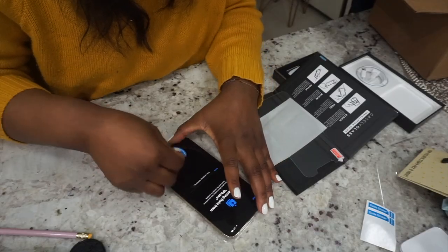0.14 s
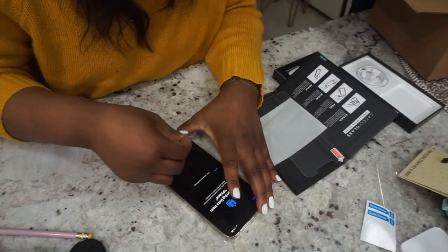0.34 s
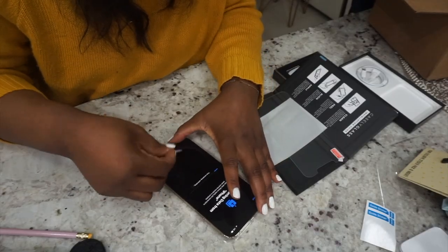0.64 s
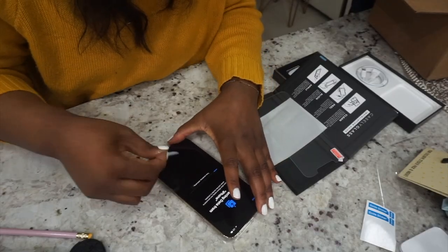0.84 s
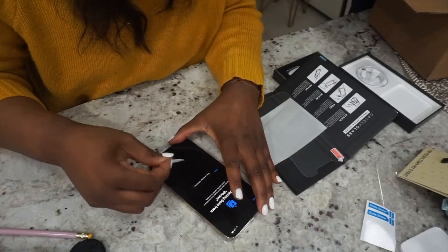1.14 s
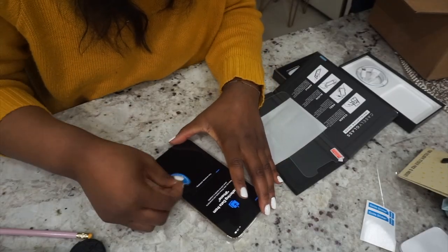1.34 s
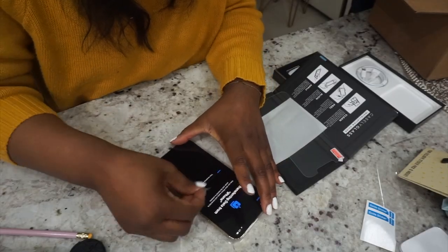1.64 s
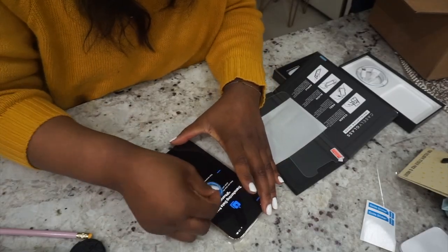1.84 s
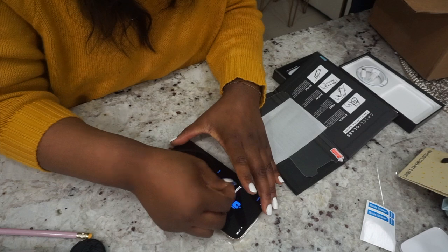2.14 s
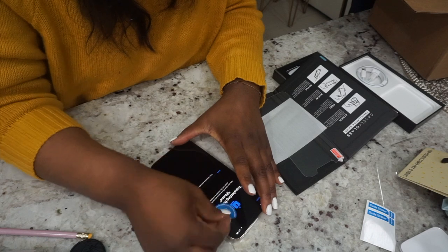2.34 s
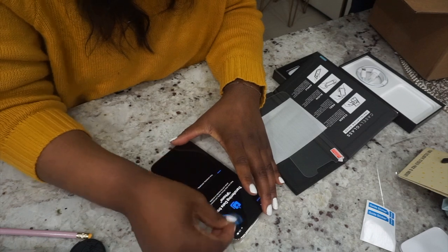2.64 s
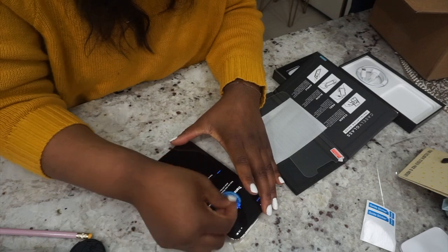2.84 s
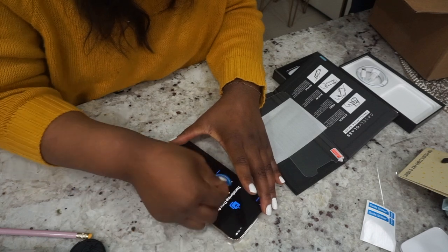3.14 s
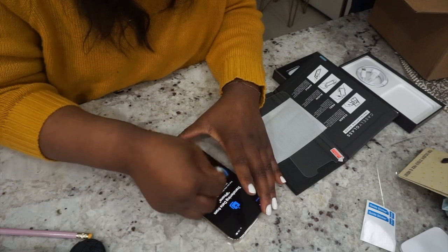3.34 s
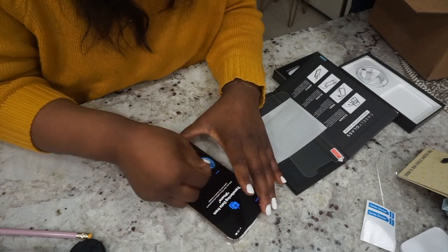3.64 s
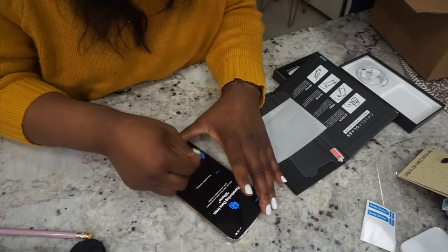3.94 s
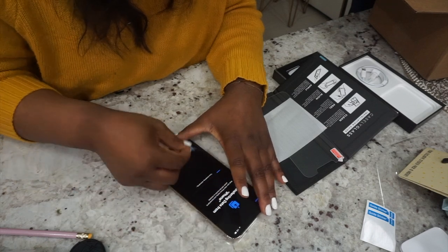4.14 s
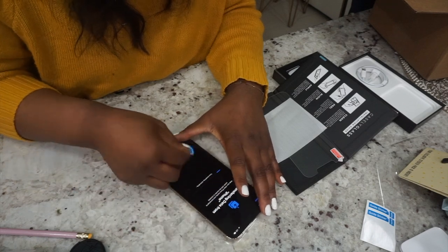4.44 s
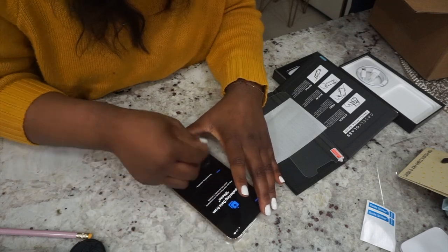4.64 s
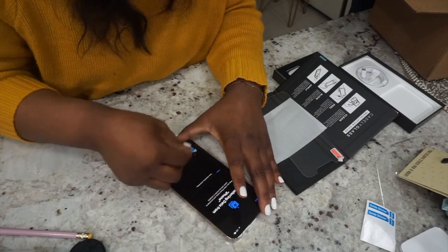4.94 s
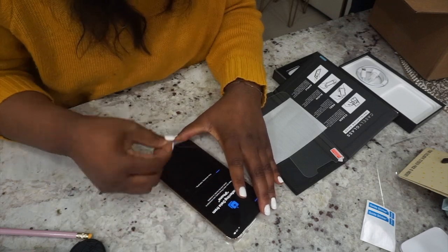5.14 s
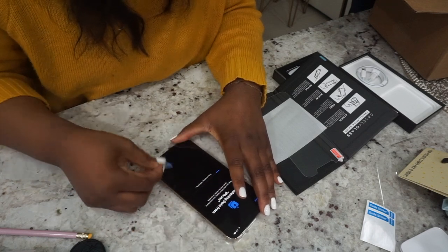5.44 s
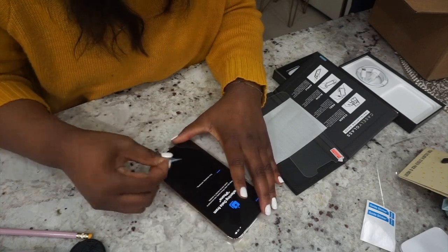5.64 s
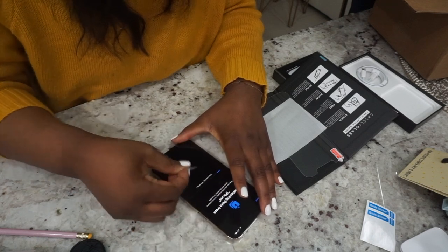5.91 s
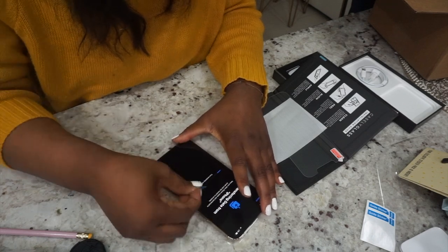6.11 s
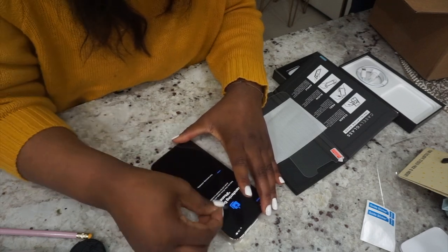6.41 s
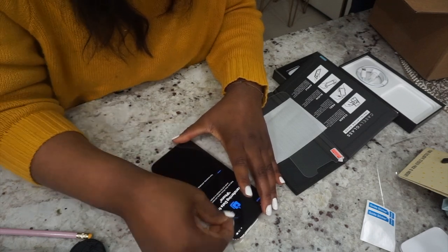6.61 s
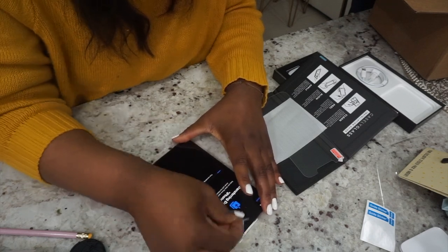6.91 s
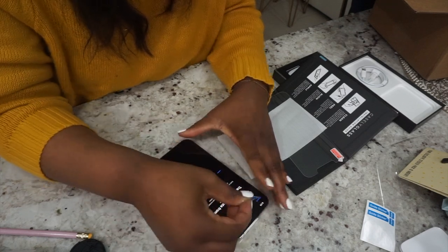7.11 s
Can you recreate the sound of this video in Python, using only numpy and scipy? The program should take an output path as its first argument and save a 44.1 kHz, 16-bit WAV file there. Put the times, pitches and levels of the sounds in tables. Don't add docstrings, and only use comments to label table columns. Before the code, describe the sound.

Long fingernails peck and chatter irregularly on a phone's glass lying on stone, crisp ticks with scratchy skids and small knocks, in a quiet, lively room.

```python
import sys
import numpy as np
from scipy import signal
from scipy.fft import rfft, irfft, next_fast_len
from scipy.io import wavfile
from scipy.ndimage import uniform_filter1d

SR = 44100
rng = np.random.default_rng(int(sys.argv[2]) if len(sys.argv) > 2 else 0)


def gain_from_db(level_db):
    decades = np.asarray(level_db, float) / 20
    return 10 ** decades


def to_wav(s):
    ch = np.atleast_2d(s).T
    pcm = np.round(np.clip(ch, -1, 1) * 32767)
    wavfile.write(sys.argv[1], SR, pcm.astype(np.int16))


N = 320607


def at_hz(points, hz):
    point_hz, value = np.array(points).T
    return np.interp(np.log(hz + 1), np.log(point_hz), value)


def shaped(x, response):
    size = next_fast_len(x.shape[-1] + SR // 20, True)
    hz = np.arange(size // 2 + 1) * SR / size
    return irfft(rfft(x, size) * response(hz), size)[..., :x.shape[-1]]


def filtered(x, order, hz, kind):
    return signal.sosfilt(signal.butter(order, hz, kind, fs=SR, output="sos"), x + 1e-18)


def contact(t, rise_s):
    return np.sin(np.pi / 2 * np.clip(t / rise_s, 0, 1)) ** 2


def place(grains, contacts, lead_s=0.0):
    out = np.zeros(N + SR)
    for s, grain in zip(np.array(contacts)[:, 0], grains):
        start = int((s - lead_s) * SR)
        out[start:start + len(grain)] += grain
    return out[:N]


def struck(modes, count, size, spread_db, rise_s, detune, near_hz=None, db_per_octave=0.0, damping=0.69):
    t = np.arange(size) / SR
    draws = rng.standard_normal((count, len(modes), 3))
    out = 0
    for k, (hz, level_db, t60) in enumerate(modes):
        far = 0 if near_hz is None else np.abs(np.log2(hz / near_hz))
        gain = gain_from_db(level_db + spread_db * draws[:, k, :1] - db_per_octave * far)
        pitch = hz * (1 + detune * draws[:, k, 1:2])
        decay = gain_from_db(-60 * (damping * t / t60) ** damping)
        out = out + gain * np.sin(2 * np.pi * pitch * t + 3 * draws[:, k, 2:]) * decay
    out = out * contact(t, rise_s)
    return out / np.abs(out).max(axis=1, keepdims=True)


# frequency in Hz, level in dB per Hz.
HISS_SPECTRUM = [(18, -34), (30, -8), (151, -5), (296, -6), (353, -3), (9900, -15.5), (11500, -23),
                 (15000, -60), (22000, -120)]
# frequency in Hz, likeness from 0 to 1.
HISS_LIKENESS = [(60, 1), (300, 0), (1500, 0), (6000, 0)]


def room_tone(level_db=-63):
    def alike(hz):
        return np.clip(at_hz(HISS_LIKENESS, hz), 0, 1)
    mid, side = rng.standard_normal((2, N))
    mid = shaped(mid, lambda hz: gain_from_db(at_hz(HISS_SPECTRUM, hz)) * np.sqrt(1 + alike(hz)))
    side = shaped(side, lambda hz: gain_from_db(at_hz(HISS_SPECTRUM, hz)) * np.sqrt(1 - alike(hz)))
    return gain_from_db(level_db) * np.array([mid + side, mid - side]) / mid.std()


# frequency in Hz, t60 in seconds.
WALL_DECAY = [(100, 0.88), (500, 0.7), (2500, 0.53), (9700, 0.54)]
# frequency in Hz, level in dB.
WALL_COLOUR = [(100, -1), (300, -2), (750, -0.5), (1500, -2), (3000, -2.5), (5500, -4), (8000, 0.5),
               (11000, -8)]


def walls(x, level_db=-34.5, near_db=22.0, near_t60=0.019, alike_hz=1470.0):
    t = np.arange(SR * 3 // 4) / SR
    white = rng.standard_normal((2, 2, len(t)))
    edges_hz = 70 * 2 ** np.arange(0, 8, .5)
    tail = 0
    for k, (low, high) in enumerate(zip(edges_hz, edges_hz[1:])):
        mid, side = filtered(white[k % 2], 2, [low, high], "band")
        hz = np.sqrt(low * high)
        alike = 1 / (1 + (hz / alike_hz) ** 2)
        fade = gain_from_db(-60 * t / at_hz(WALL_DECAY, hz)) + gain_from_db(near_db - 60 * t / near_t60)
        pair = np.sqrt(1 + alike) * mid + np.sqrt(1 - alike) * side * [[1], [-1]]
        tail = tail + gain_from_db(at_hz(WALL_COLOUR, hz)) * fade * pair
    tail = tail * gain_from_db(level_db) * contact(t, .011)
    return signal.fftconvolve(x[None], tail, axes=1)[:, :N]


# delay in ms, level in dB.
FIRST_ECHO = (9.1, -15.5)
# direct path in ms, counter bounce in ms after it.
PORT_DELAYS = [(.0, .113), (.027, .082)]
# direct level in dB, counter bounce level in dB.
PORT_LEVELS = [(-1.8, -9), (0.5, -10)]
# frequency in Hz, difference in dB.
PORT_TILT = [(200, 2), (1000, 0.5), (4000, -1), (9000, -3), (11000, 4), (12500, 9)]


def ports(x):
    def path(hz, ms, level_db):
        return gain_from_db(level_db) * np.exp(-2j * np.pi * hz * ms / 1000)

    echo_ms, echo_db = FIRST_ECHO
    x = shaped(x, lambda hz: 1 + path(hz, echo_ms, echo_db))
    heard = []
    for (ms, late_ms), (db, late_db), half in zip(PORT_DELAYS, PORT_LEVELS, (.5, -.5)):
        def response(hz):
            bounced = 1 + path(hz, late_ms, late_db)
            return path(hz, ms, db) * bounced * gain_from_db(half * at_hz(PORT_TILT, hz))
        heard.append(shaped(x, response))
    return np.array(heard)


def shadows(x, level_db=-9.0, from_hz=3300.0):
    flicker = uniform_filter1d(rng.standard_normal(N), size=90)
    bright = filtered(x, 2, from_hz, "high")
    return gain_from_db(level_db) * bright * flicker / flicker.std() * [[1], [-1]]




def shared_out(contacts, tick_db, knock_db, scratch_db):
    return [(s, db + tick_db, hz, db + knock_db, db + scratch_db) for s, db, hz in contacts]


# start in seconds, strength in dB.
PRESSES = [(.0574, -46), (.463, -45), (0.4738, -47.5), (0.7227, -45), (.727, -43), (1.0268, -53),
           (1.0646, -42), (1.2909, -43), (1.781, -36.5), (2.8277, -37.5), (3.0763, -47.5), (3.319, -43),
           (4.2025, -46), (4.405, -51), (4.5033, -36.5), (4.6545, -40.5), (4.927, -42), (5.0169, -27.5),
           (5.217, -47), (5.2735, -41), (5.4493, -42), (5.4801, -48), (5.523, -38), (5.9587, -44),
           (6.0233, -44), (6.0299, -29), (6.2064, -41), (6.8683, -35), (7.2344, -39)]


def presses():
    return shared_out([(s, db, 2100) for s, db in PRESSES], -7, 0.09, -11.5)


def brush(start_s=.478, end_s=0.56, press_db=-60, swell_db_per_s=298):
    times = np.linspace(end_s, start_s, num=14) + rng.uniform(-.002, .002, size=14)
    return [(s, -54, 3500, press_db + swell_db_per_s * (s - start_s), -54) for s in times]


# start in seconds, strength in dB.
SKIDS = [(0.4893, -47), (1.0434, -37), (1.5595, -36), (2.1023, -29.5), (2.1107, -47), (2.297, -23.5),
         (2.343, -37), (2.906, -39), (2.9178, -31), (3.8953, -34.5), (3.901, -27), (3.971, -27.5),
         (4.6817, -24.5), (4.73, -33), (5.017, -25), (5.0465, -34), (5.2738, -27.5), (5.52, -26.5),
         (5.529, -27), (5.9856, -46), (6.023, -33), (6.298, -30), (6.5648, -35.5), (6.8298, -41)]


def skids():
    return shared_out([(s, db, 2900) for s, db in SKIDS], -10, -19, 0.092)


def wobble(start_s=7.0874, swing_s=.0558, shrink=.853, other_edge_share=.335):
    swings_s = swing_s * shrink ** np.arange(5)
    near, other = [], []
    for k, swing in enumerate(swings_s):
        s = start_s + swings_s[:k].sum()
        db = -23.5 - 0.86 * k * k
        near.append((s, db, 2500))
        other.append((s + other_edge_share * swing, db - 0.5, 2500))
    return shared_out(near, -2.5, 0.1, -20.5) + shared_out(other, -5, 0.1, -27)


# start in seconds, strength in dB, glass pitch in Hz.
TIPS = [(1.0078, -36, 2200), (1.0106, -38.5, 2930), (1.0942, -24, 1730), (1.1036, -25.5, 2650),
        (1.2814, -35.5, 2560), (1.305, -22, 2600), (1.3538, -30, 1520), (1.37, -23.5, 1710),
        (1.3772, -25.5, 2680), (1.5545, -27, 2520), (1.573, -23, 2640), (2.2887, -35.5, 2260),
        (2.5476, -40, 2300), (2.8606, -29, 1470), (2.8694, -25.5, 2650), (3.5944, -43, 2080),
        (3.6753, -53, 1360), (3.8756, -43.5, 2830), (4.1396, -44, 2850), (5.0351, -48, 1480),
        (5.4886, -17.5, 1590), (5.5069, -19, 2680), (5.7757, -36.5, 2860), (5.9944, -19, 1150),
        (6.0144, -20.5, 2580), (6.2681, -22.5, 2520), (6.2763, -22.5, 2840), (6.4767, -40, 2460),
        (6.7466, -41, 2470)]


def tips():
    return shared_out(TIPS, -2, 0.091, -19)


# start in seconds, strength in dB, glass pitch in Hz, body knock in dB.
CENTRED_HITS = [
    (4.1206, -36.5, 2400, -48),
    (4.4779, -16, 3000, -57),
    (5.0141, -20, 4340, -62),
    (5.5374, -17, 3030, -31),
    (5.5450, -21, 2270, -33),
    (6.8616, -24.5, 1520, -52),
]
# start in seconds, strength in dB, glass pitch in Hz, body knock in dB.
SQUARE_HITS = [(.7711, -62, 2350, -60), (4.215, -43, 4270, -53), (0.4004, -44.5, 3130, -62),
               (.971, -47, 3070, -54), (1.0559, -17, 3280, -48), (1.071, -47, 3170, -55),
               (1.3477, -24, 2130, -48), (1.6171, -25, 1780, -32), (2.1387, -22, 2940, -29.5),
               (2.3568, -28.5, 2450, -61), (2.3815, -31, 1310, -49), (2.6456, -17, 2390, -35.5),
               (3.1646, -32, 2650, -32), (3.419, -22, 4380, -36), (3.4196, -21.5, 1430, -35),
               (1.252, -48, 3500, -60), (4.4159, -42.5, 2960, -57), (4.4572, -19, 4200, -57),
               (4.7239, -28, 5250, -59), (4.7441, -26, 3020, -42), (4.7616, -29, 2120, -32),
               (4.7712, -31.5, 3400, -50), (5.2642, -24.5, 2900, -43), (5.2672, -19.5, 3500, -32),
               (5.2846, -35, 2040, -51), (5.564, -30, 2200, -43), (6.5954, -23, 2500, -37),
               (7.0658, -31, 2700, -42)]


def square_hits():
    centred = [(s, db, hz, knock_db, db - 19) for s, db, hz, knock_db in CENTRED_HITS]
    return centred + [(s, db, hz, knock_db, db - 12.5) for s, db, hz, knock_db in SQUARE_HITS]


# start in seconds, strength in dB, glass pitch in Hz, slide in dB.
SLAPS = [(1.6072, -31, 2000, 7.5), (1.6272, -21, 2100, 4), (1.8984, -25, 1570, 7.5), (1.9068, -34, 1420, 3),
         (2.1208, -23.5, 1370, 4), (2.1281, -25.5, 1460, -1), (2.3736, -24.5, 1130, 2.5),
         (2.8483, -31.5, 1660, 5.5), (2.9333, -27.5, 1400, 2.5), (3.1695, -30, 1470, -3.5),
         (3.178, -28, 1770, 2.5), (3.4094, -26, 1600, 0), (3.4481, -39, 1660, -5),
         (5.5345, -14.5, 2500, -9), (6.0621, -28, 1770, 4), (6.3062, -22, 2070, 2)]
# start in seconds, strength in dB, glass pitch in Hz, slide in dB.
FIRM_PECKS = [(.1753, -31, 2750, -2), (1.7897, -26.5, 2730, -8.5), (1.864, -30.5, 4560, -1),
              (1.8735, -21.5, 4420, -2), (1.8814, -16, 4350, -1.5), (2.1315, -23.5, 2950, -3),
              (2.3626, -23.5, 2470, 3), (2.5593, -27.5, 2410, -1), (2.6558, -23, 2300, 3),
              (3.1835, -19.5, 3860, -17), (3.1937, -24, 2760, 0), (3.4285, -31.5, 2950, 2),
              (3.4839, -29, 4930, -5.5), (3.696, -23, 2970, 0.5), (3.7941, -27.5, 2380, -1.5),
              (4.1723, -31, 3160, 0), (4.2431, -36, 2890, 1), (4.4993, -32, 2200, 8),
              (4.6996, -30, 2240, -1.2), (4.7341, -27, 3120, -8), (4.7538, -24.5, 2250, -3.5),
              (4.939, -22, 3000, -3.5), (5.0264, -22.5, 3750, -4.5), (5.4647, -28.5, 2820, 1.5),
              (5.7488, -28.5, 2810, 0.8), (6.0004, -16.5, 2610, -6), (6.0389, -30, 2340, 1.5),
              (6.057, -21, 3070, -2.5), (6.2297, -26.5, 2900, -2), (6.5002, -27, 2350, -2)]
# start in seconds, strength in dB, glass pitch in Hz, slide in dB.
FLICKS = [(.1633, -44, 2700, -0.5), (.1675, -32.5, 2900, 5), (.1716, -21.5, 3900, -11),
          (.7593, -18, 2960, -9), (.7641, -24.5, 2950, -0.5), (1.0468, -23, 3330, 1.5),
          (1.0527, -21, 4040, -3), (1.0585, -20, 3500, 1), (1.3319, -26.5, 2270, 8),
          (1.3387, -19, 4200, -6), (1.6318, -21, 2170, -3.5), (2.6331, -23, 2390, 1),
          (2.638, -23.5, 2350, 1.5), (3.6141, -19, 4980, -11), (3.6284, -22, 4560, -6),
          (3.6807, -23.5, 1390, 0), (3.6894, -20, 3260, -4), (4.4748, -44, 3700, 16),
          (4.4824, -19.5, 2890, -8), (4.49, -13.5, 2920, -13), (4.5088, -22.5, 2850, -4),
          (5.0063, -19.5, 1900, -8), (6.3211, -21, 1820, -2.5), (6.5754, -23, 2500, -10),
          (6.578, -23.5, 3650, -6), (6.5876, -24.5, 2500, -7), (6.7808, -26, 2350, -4.5),
          (6.8364, -31.5, 3350, 0), (6.8472, -24.5, 3180, -7), (6.852, -19.5, 2280, -1.5)]


def pecks():
    kinds = [(SLAPS, -7.5), (FIRM_PECKS, -8.5), (FLICKS, -21)]
    return [(s, db, hz, db + body_db, db + slide_db)
            for rows, body_db in kinds for s, db, hz, slide_db in rows]


def cracks(taps, low_db=20.5, mid_db=18.0, high_db=12.5):
    signs = rng.choice([-1, 1], (len(taps), 3))
    ranges = [(3, low_db, 450, 1400), (1, mid_db, 1400, 5000), (4, high_db, 5000, 12000)]
    out = 0
    for k, (column, level_db, low, high) in enumerate(ranges):
        clicks = place(gain_from_db(taps[:, column, None] + level_db) * signs[:, k, None], taps)
        out = out + filtered(clicks, 3, [low, high], "band")
    return out


# frequency in Hz, level in dB per Hz.
GRIT_SPECTRUM = [(1800, -5.5), (4000, -0.5), (6000, -1), (8500, -2), (10500, 5), (12500, 1.5)]


def scratch(taps, level_db=1.0, t60=0.0094, hold_s=0.0006, drag_db=-17.0, drag_t60=0.052, skid_s=0.0014):
    t = np.arange(2048) / SR
    grit = rng.standard_normal((len(taps), 2048))
    grit = shaped(grit, lambda hz: gain_from_db(at_hz(GRIT_SPECTRUM, hz)) * (hz > 1500))
    after = np.maximum(t - skid_s - hold_s * 2 * rng.random((len(taps), 1)), 0)
    fade = gain_from_db(-60 * after / t60) + gain_from_db(drag_db - 60 * after / drag_t60)
    fade = fade * contact(t, skid_s)
    return place(gain_from_db(taps[:, 4:5] + level_db) * grit / grit.std() * fade, taps, lead_s=0.00055)


# start in seconds, length in seconds, grit in dB, glass pitch in Hz, glass hum in dB.
SLIDES = [(0.162, 0.004, -35, 2960, -35), (0.231, 0.078, -72, 1280, -59), (0.454, 0.017, -64, 3600, -56),
          (1.0436, 0.0026, -32, 3300, -53), (1.064, 0.0036, -34, 3260, -31),
          (1.329, 0.0095, -31, 2270, -39), (1.342, 0.015, -31, 3380, -34), (1.55, 0.0032, -58, 1520, -51),
          (1.6045, .008, -34, 2100, -33), (1.616, 0.015, -27, 2980, -31.5),
          (1.885, 0.013, -39, 4200, -31.5), (2.117, 0.0027, -40, 2000, -45), (2.13, 0.0058, -26, 2500, -47),
          (2.356, 0.0035, -27, 2500, -44), (2.873, 0.0059, -54, 2500, -38.5),
          (2.858, 0.013, -60, 1040, -40.5), (4.953, .001, -40, 3000, -40), (2.931, 0.0058, -35, 1530, -48),
          (3.174, 0.0064, -35, 1700, -43), (3.197, 0.0022, -37, 2700, -51), (3.423, 0.0054, -38, 1600, -48),
          (3.62, 0.0011, -45, 5000, -34), (3.693, 0.0086, -60, 880, -41.5), (4.187, .002, -44, 3000, -52),
          (4.462, .001, -33, 4500, -38), (4.479, 0.0037, -38, 2800, -36), (4.5024, 0.0029, -50, 980, -36),
          (4.509, 0.0026, -50, 870, -32.5), (5.035, 0.0028, -40, 3000, -37),
          (5.267, 0.0049, -49, 4950, -29), (5.29, 0.0044, -40, 3500, -49), (5.52, 0.002, -33, 3200, -29.5),
          (5.989, 0.01, -67, 1190, -44), (6.009, 0.0071, -31, 2000, -45), (6.052, 0.0094, -24.5, 2580, -41),
          (6.273, 0.004, -48, 1360, -48), (6.31, 0.0037, -20, 2000, -38), (6.584, 0.0048, -22, 2500, -35),
          (6.857, 0.011, -38, 2160, -35.5), (3.677, 0.0018, -51, 2500, -39)]


def slides(edge_s=0.0013, sharpness=2.9, lumps_db=2.0):
    _, length_s, grit_db, hz, hum_db = np.array(SLIDES).T[:, :, None]
    t = np.arange(4096) / SR
    noise = rng.standard_normal((3, len(SLIDES), 4096))
    grit = shaped(noise[0], lambda f: gain_from_db(at_hz(GRIT_SPECTRUM, f)) * (f > 4000))
    hum = shaped(noise[1], lambda f: 1 / (1 + (sharpness * (f / hz - hz / (f + 1))) ** 2))
    lumps = uniform_filter1d(noise[2], size=60)
    fade = contact(t, edge_s) * contact(length_s + edge_s - t, 2 * edge_s)
    fade = fade * gain_from_db(lumps_db * lumps / lumps.std())
    both = gain_from_db(grit_db) * grit / grit.std() + gain_from_db(hum_db) * hum / hum.std(axis=1, keepdims=True)
    return place(both * fade, SLIDES)


# frequency in Hz, level in dB, t60 in seconds.
BODY_MODES = [(626, 3.5, 0.023), (897, 2.5, 0.022), (1042, 4, 0.023), (1125, 2.5, 0.012), (520, -1, 0.027),
              (737, -11.5, 0.095)]
# frequency in Hz, level in dB, t60 in seconds.
SLAB_MODES = [(120, -4, 0.083), (214, 0, 0.093), (267, 6.5, 0.064)]


def knock(taps, rocking, level_db=-4.0, slab_db=-36.0, flatness=0.66, hollow_db=0.0, hollow_hz=742.0):
    body = struck(BODY_MODES, len(taps), size=2048, spread_db=3.5, rise_s=0.0006, detune=0.045, damping=1.4)
    body = place(gain_from_db(taps[:, 3:4] + level_db) * body, taps, lead_s=0.00038)
    body = filtered(body, 2, 350.0, "high")
    body = body + gain_from_db(hollow_db) * signal.lfilter(*signal.iirpeak(hollow_hz, 25.0, fs=SR), body)
    knock_db, scratch_db = rocking.T[3:, :, None]
    slab = struck(SLAB_MODES, len(rocking), size=4096, spread_db=1.5, rise_s=0.0094, detune=0.11)
    shake_db = knock_db + slab_db + flatness * np.clip(knock_db - scratch_db, 0, 20)
    return body + place(gain_from_db(shake_db) * slab, rocking)


def blurred_glass(taps, t60=0.011):
    t = np.arange(1024) / SR
    tick_db, hz = taps.T[1:3, :, None]
    return place(np.sin(2 * np.pi * hz * t) * gain_from_db(tick_db - 60 * t / t60), taps)


# frequency in Hz, level in dB, t60 in seconds.
GLASS_MODES = [(1568, 3, 0.012), (2118, -5.5, 0.029), (2650, -4.5, 0.025), (3140, 6, 0.0083),
               (3750, 1.5, 0.018), (4200, -7, 0.03), (4560, -21, 0.002)]


def glass(taps, own_db=0.0, rest_db=-2.5, t60=0.025, rise_s=0.0017, rebound_s=0.00219, rebound_db=-12,
          touch_s=0.0027, ring_db=-4.0):
    t = np.arange(1024) / SR
    tick_db, hz = taps.T[1:3, :, None]
    touch = contact(touch_s - t, rise_s) + gain_from_db(ring_db - 60 * t / t60)
    own = np.sin(2 * np.pi * hz * t) * contact(t, rise_s) * touch
    own = own / np.abs(own).max(axis=1, keepdims=True)
    rest, again = (struck(GLASS_MODES, len(taps), size=1024, spread_db=1.0, rise_s=0.0008, detune=0.042,
                          near_hz=hz, db_per_octave=4.5, damping=1.8) for _ in range(2))
    again = again * gain_from_db(rebound_db + 3.0 * rng.uniform(-1, 1, (len(taps), 1)))
    first = gain_from_db(tick_db) * (gain_from_db(own_db) * own + gain_from_db(rest_db) * rest)
    return place(first, taps, lead_s=.0005) + place(gain_from_db(tick_db) * again, taps, lead_s=-rebound_s)


def scene():
    rocking = np.array(tips() + wobble() + presses())
    taps = np.vstack([rocking, square_hits(), pecks(), skids(), brush()])
    crack, grit, slide = cracks(taps), scratch(taps), slides()
    body = knock(taps, rocking)
    direct = glass(taps) + body + grit + slide + gain_from_db(-5.5) * crack
    to_walls = gain_from_db(-7.0) * body + gain_from_db(-6.5) * slide + gain_from_db(-13) * grit
    to_walls = to_walls + gain_from_db(-7.0) * blurred_glass(taps) + crack
    return gain_from_db(0.68) * ports(direct) + walls(to_walls) + room_tone() + shadows(direct)


def low_pass(x):
    return signal.sosfilt(signal.butter(12, 12320, fs=SR, output="sos"), x)


# start in seconds, depth in dB, recovery in seconds.
GAIN_DIP = (3.903, -15, .006)
# frequency in Hz, level in dB.
TOP_CUT = [(11000, -1), (11250, -22), (11650, -30.5), (16000, -76)]


def record(dry):
    start_s, dip_db, recovery_s = GAIN_DIP
    since = np.maximum(np.arange(N) / SR - start_s, 0) / recovery_s
    x = dry * gain_from_db(dip_db * since * np.exp(1 - since))
    x = filtered(x, 2, 50.0, "high")
    x = shaped(x, lambda hz: gain_from_db(at_hz(TOP_CUT, hz)))
    return low_pass(x)


dry = scene()
out = record(dry)
to_wav(out)
```